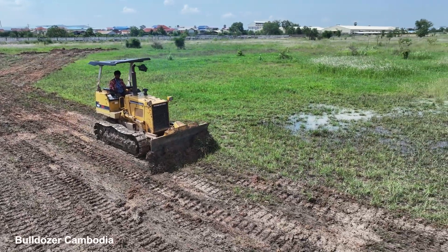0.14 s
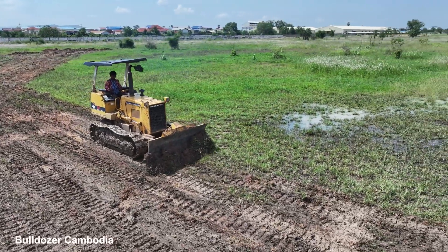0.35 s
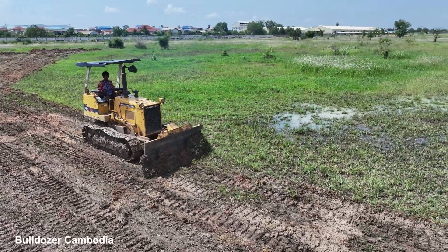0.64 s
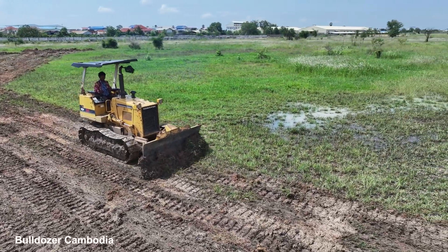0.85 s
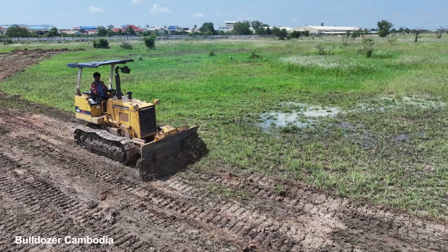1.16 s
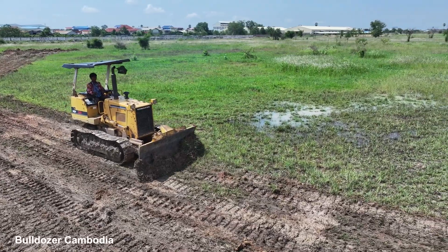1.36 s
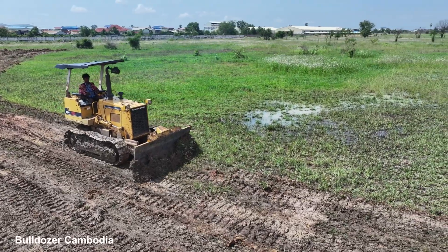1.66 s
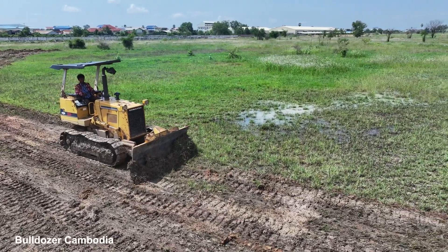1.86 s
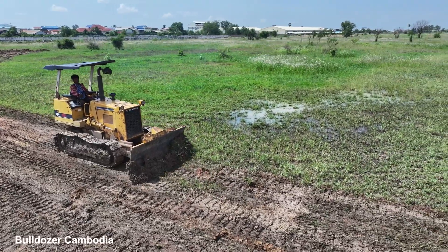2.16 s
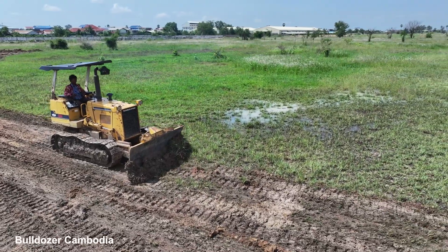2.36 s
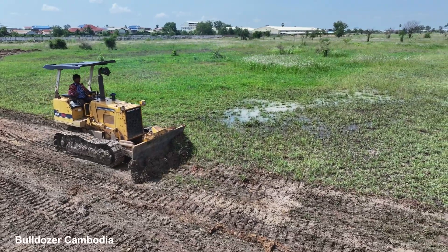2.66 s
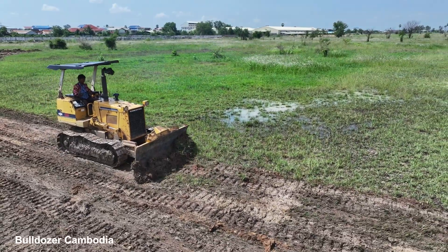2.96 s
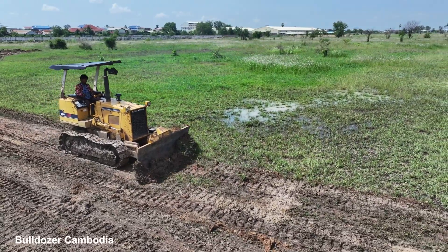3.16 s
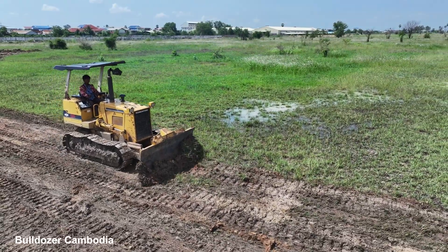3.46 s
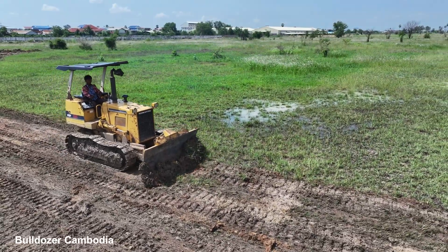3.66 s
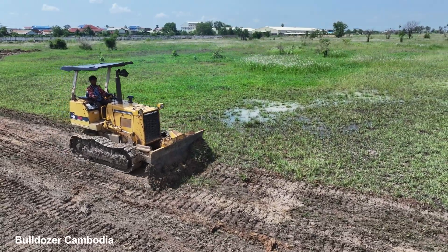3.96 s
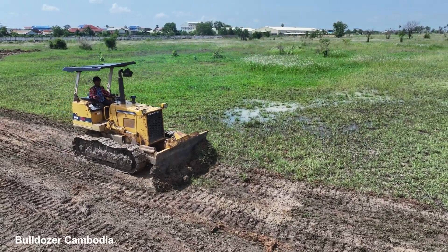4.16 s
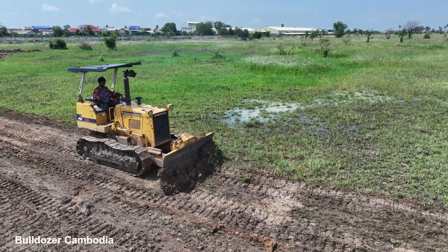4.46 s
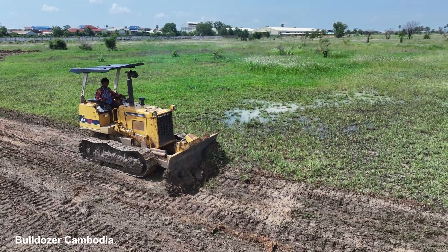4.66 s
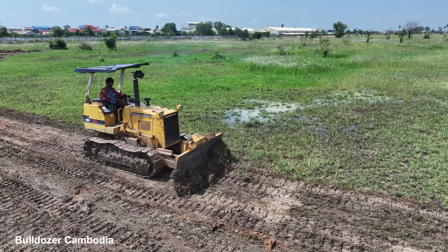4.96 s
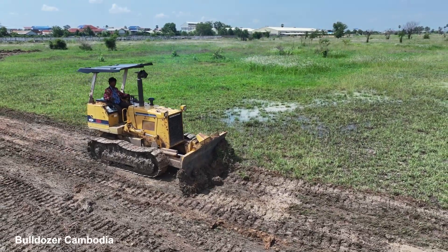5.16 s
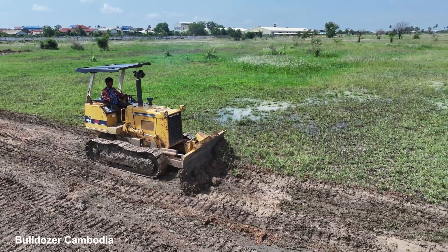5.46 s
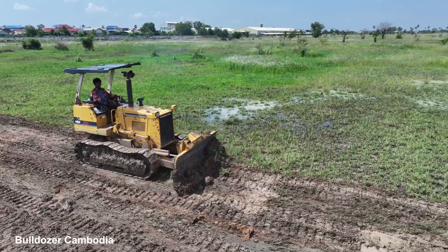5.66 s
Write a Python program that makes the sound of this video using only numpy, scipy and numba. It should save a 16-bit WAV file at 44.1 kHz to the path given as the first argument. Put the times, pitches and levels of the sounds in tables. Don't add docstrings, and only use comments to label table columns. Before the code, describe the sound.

A bulldozer works on open ground. First comes a muffled, steady engine hum with soft fan noise; then a sudden cut to a close, clattering diesel. Its two overlapping drones beat together as the pitch sags under load and rises again. Track plates clank twice, a pump whines briefly, and a bassy thump comes before the second clank. The engine ends running freer; single-channel outdoor pickup, little echo.

```python
import sys
import numpy as np
from scipy import signal
from scipy.fft import rfft, irfft
from scipy.io import wavfile
from scipy.ndimage import uniform_filter1d
from numba import njit

SR = 44100
rng = np.random.default_rng(int(sys.argv[2]) if len(sys.argv) > 2 else 0)


def bounce(signal):
    frames = np.transpose(np.atleast_2d(signal))
    limited = np.clip(frames, -1, 1)
    pcm = np.round(limited * 32767).astype(np.int16)
    wavfile.write(sys.argv[1], SR, pcm)


def natural_amplitude(level_db):
    exponent = np.asarray(level_db, float) / 20
    return 10 ** exponent


N = 256662
T = np.arange(N) / SR
HZ = np.fft.rfftfreq(N, 1 / SR) + 1e-3

# time in seconds, firing rate in Hz.
NEAR_SPEED = [
    (2.136, 72.1),
    (2.387, 71.59),
    (2.759, 77.41),
    (3.086, 79.74),
    (3.67, 77.49),
    (3.886, 72.52),
    (4.219, 75.9),
    (4.713, 71.83),
    (5.106, 73.38),
    (5.82, 80.02),
]
NEAR_START_S = NEAR_SPEED[0][0]


def curve(table):
    s, *columns = np.transpose(table)
    return [np.interp(T, s, column) for column in columns]


def colour(points):
    hz, db = np.transpose(points)
    return natural_amplitude(np.interp(np.log(HZ), np.log(hz), db))


def unit(x):
    return x / np.sqrt(np.mean(x ** 2))


def walk(rate):
    hold = int(SR / rate)
    steps = np.repeat(rng.standard_normal(N // hold + 1), hold)
    return 1.21 * uniform_filter1d(uniform_filter1d(steps, hold), hold)[:N]


@njit
def ring(x, hz, width):
    y, band, low = np.empty(len(x)), 0., 0.
    for i in range(len(x)):
        g, damping = np.tan(np.pi * hz[i] / SR), width / hz[i]
        v = (band + g * (x[i] - low)) / (1 + g * (g + damping))
        band, low, y[i] = 2 * v - band, low + 2 * g * v, damping * v
    return y


def through_mic(x):
    # frequency in Hz, gain in dB.
    mic_colour = [(7400, 0.5), (8100, -6.5), (8400, -21), (8700, -5), (9700, -0.5), (11000, -8.5),
                  (11600, -19), (11750, -59), (12350, -69), (12500, -21), (14000, -16), (15200, -23),
                  (15600, -26), (15800, -74)]
    return irfft(rfft(x) * colour(mic_colour), N)


def exhaust(turns, tone_db, orders, orders_db, wobble_db):
    out = natural_amplitude(tone_db + 0.32 * walk(9)) * np.cos(2 * np.pi * turns)
    for multiple, db in orders:
        drift = rng.random() + .0025 * multiple * walk(6)
        level = natural_amplitude(db + orders_db + wobble_db * walk(3.893))
        out += level * np.cos(2 * np.pi * (multiple * turns / 6 + drift))
    return np.sqrt(2) * out


def knocks(turns, pattern_db, unevenness, fade):
    first = int(np.floor(turns.min()))
    firing = np.floor(turns - first).astype(int) + first % 6
    chance_db = 1.2 * rng.standard_normal(N // 400)[firing]
    cylinder_db = unevenness * np.array(pattern_db)[firing % 6]
    sharp = natural_amplitude(cylinder_db + chance_db) * np.exp(-(turns % 1) / fade)
    return uniform_filter1d(sharp, size=230)


def roar(points, peaks, knock, share, flicker_db):
    rings = 1 + sum(natural_amplitude(db) / (1 + (2 * (HZ - hz) / width) ** 2) for hz, width, db in peaks)
    noise = rfft(rng.standard_normal(N)) * colour(points) * rings
    noise *= N / np.sqrt(2 * np.sum(abs(noise) ** 2))
    low, high = np.zeros(N), np.zeros(N)
    for octave in np.arange(5, 14.6, .5):
        band = irfft(noise * np.clip(1 - 2 * abs(np.log2(HZ) - octave), 0, 1), N)
        beat = unit(1 + share * np.clip((octave - 8.2) / 6.0, 0, 1.2) * knock)
        band *= beat * natural_amplitude(flicker_db * walk(18))
        if octave < 10:
            low += band
        else:
            high += band
    return low, high


def far_engine():
    # time in seconds, firing rate in Hz, level of the firing tone in dB.
    far_speed = [
        (0.0, 79.66, -23.2),
        (1.1, 79.7, -21.4),
        (2.18, 79.73, -21.5),
        (2.24, 81.31, -21.7),
        (2.99, 80.99, -24.6),
        (3.6, 79.86, -33.9),
        (3.95, 79.21, -35),
        (4.55, 79.88, -37),
    ]
    # multiple of the four-stroke cycle (the high ones are gear meshes), level in dB.
    far_orders = [(3, -37), (4, -38.5), (5, -45), (7, -34.5), (8, -32.5), (9, -38.5), (10, -39.5),
                  (11, -41.5), (12, -38), (13, -48.5), (14, -45.5), (15, -42.5), (17, -42), (27.5, -47),
                  (48, -53.5)]
    # frequency in Hz, level in dB per Hz.
    far_roar = [(33, -24), (60, 6.5), (120, 4.5), (220, -1.5), (350, -5.5), (430, -9), (630, -7),
                (800, -23.5), (1400, -20.5), (1600, -21.5), (1900, -15.5), (2600, -23), (3500, -24),
                (8000, -40)]
    # frequency in Hz, width in Hz, level in dB.
    far_lines = [(649, 17, 2), (890, 14, 1), (993, 18, 1), (1136, 12, 0.5), (1389, 25, 0),
                 (1501, 5.3, -15.5), (1772, 47, 1.5), (1924, 18, -6), (2113, 30, -2.5), (3445, 45, -6.5)]
    hz, tone_db = curve(far_speed)
    turns = .947 + np.cumsum(hz) / SR
    knock = knocks(turns, [-7, -2, 2, -6, -1, -4], unevenness=1, fade=0.5)
    low, high = roar(far_roar, far_lines, knock, share=1.1, flicker_db=0.0)
    surged = T >= NEAR_START_S
    roar_db = -32.3 - 2.5 * surged
    orders_db = -2 + 3.0 * surged
    hum = np.sqrt(2) * natural_amplitude(-40.5 + 1.5 * walk(1.9)) * np.sin(2 * np.pi * 41.9 * T)
    sound = exhaust(turns, tone_db, far_orders, orders_db, wobble_db=2.0) + hum
    sound += natural_amplitude(roar_db) * through_mic(low + high)
    return sound * np.clip((far_speed[-1][0] - T) / .03, 0, 1)


def thump():
    t = np.clip(T - 4.5206, 0, None)
    turns = 62 * t + 520 * .003 * (1 - np.exp(-t / .003))
    strength = np.exp(-t / .02) * (1 - np.exp(-(t / .0008) ** 2))
    swell = t / 0.028 * np.exp(1 - t / .03)
    boom = natural_amplitude(-18.5) * np.sin(2 * np.pi * 108 * t) + natural_amplitude(-25) * np.sin(2 * np.pi * 52 * t)
    return natural_amplitude(-5.5) * strength * np.sin(2 * np.pi * turns) + swell * boom


def clanks():
    # start in seconds, rise of the scrape in seconds, plate level in dB, link pitch in Hz,
    # link level in dB.
    track_clanks = [
        (2.6148, 0.00091, -14, 1100, -24),
        (4.607, 0.0066, -16.5, 1215, -21),
    ]
    rattle_colour = colour([(300, -14), (1500, -1), (3000, -3.5), (9000, -8.5), (16000, -2)])
    out = np.zeros(N)
    for s, rise, plate_db, link_hz, link_db in track_clanks:
        t = np.clip(T - s, 0, None)
        scrape = np.clip(t / rise, 0, 1) * np.exp(-(t / .03) ** 2)
        grit = rng.standard_normal(N) * natural_amplitude(2 * walk(500))
        rattle = unit(irfft(rfft(grit) * rattle_colour, N))
        plate = t / 0.017 * np.exp(.5 - .5 * (t / 0.019) ** 2) * np.sin(2 * np.pi * 502 * t)
        link = (t / 0.011) ** 2 * np.exp(2 - 2 * t / 0.0098) * np.sin(2 * np.pi * link_hz * t)
        out += natural_amplitude(-19.3) * through_mic(scrape * rattle) + natural_amplitude(plate_db) * plate + natural_amplitude(link_db) * link
    return out


def pump():
    t = T - 3.2
    swell = np.exp(-(t / np.where(t < 0, .25, .13)) ** 2)
    turns = 206 * t + 32 * t ** 2 / 2
    return natural_amplitude(-27) * swell * np.sin(2 * np.pi * turns)


def near_engine():
    # multiple of the four-stroke cycle (the high ones are gear meshes), level in dB.
    near_orders = [(5, -40.5), (7, -31), (8, -37), (9, -37), (11, -40.5), (12, -35.5), (13, -47),
                   (14, -42.5), (15, -41), (18, -43), (22, -48), (27.5, -37.5), (40, -45.5), (48, -48.5)]
    # frequency in Hz, level in dB per Hz.
    near_roar = [(40, -8), (100, -5), (200, -2), (340, 1), (430, -5.5), (600, 1.5), (900, -16),
                 (1140, -13.5), (1350, -15.5), (1700, -11.5), (2800, -15), (4500, -20.5), (7500, -26),
                 (11000, -24.5)]
    # frequency in Hz, width in Hz, level in dB.
    near_panels = [(600, 18, -5), (1054, 16, -1), (1147, 38, 1), (1402, 22, -1), (1605, 64, 0.5),
                   (2115, 15, 3.5), (2550, 63, -3.5), (3450, 39, -7), (3850, 53, -3), (4205, 46, -3),
                   (4950, 96, -4), (5390, 78, 0), (6350, 84, -2.5)]
    hz, = curve(NEAR_SPEED)
    on = T >= NEAR_START_S
    turns = .233 + np.cumsum(hz * on) / SR
    free = (hz - 72) / (80 - 72)
    turned = np.clip((T - 3.65) / 1.15, 0, 1)

    valve_share = .85 - .4 * free - .12 * turned
    valve_turns = turns[int(3.888 * SR)]
    knock = knocks(turns - valve_turns, [11, 3.5, -2.5, -12, -13, -12], valve_share, fade=0.74)
    low, high = roar(near_roar, near_panels, knock, share=0.71, flicker_db=1.04)

    block_hz = 2120 + (1900 - 2120) * np.clip(4 * turned - 1, 0, 1)
    block = rng.standard_normal(N) * (1 + 0.46 * knock ** 2)
    block = unit(ring(ring(block, block_hz, 300.0), block_hz, 300.0))
    high = unit(high) + natural_amplitude(-9.5 + 1.3 * turned) * block

    echo_hz = np.clip(2850 * 2 ** ((T - NEAR_START_S) / 1.95), 2850, 7500)
    high = through_mic(high - .45 * ring(high, echo_hz, 1000.0))

    shield_db = -1.4 * np.sin(np.pi * turned)
    knock_db = -32.2 + free * (-.6 + 1.1 * turned) + shield_db
    roar_db = -26.5 - 2.5 * free * (1 - turned) - 1.5 * turned
    body = natural_amplitude(roar_db) * unit(low) + natural_amplitude(knock_db) * high
    tone_db = -14.2 + free * (-1.6 + 1.4 * turned)
    pulses = exhaust(turns, tone_db, near_orders, -.6 * turned, wobble_db=2.5)
    return on * (pulses + body + pump())


def scene():
    fade_in = np.clip(T / .002, 0, 1) ** 2
    return fade_in * (far_engine() + thump() + clanks() + near_engine())[None]


def top_cut(x):
    return signal.sosfilt(signal.butter(12, 16510, fs=SR, output="sos"), x)


def record(dry):
    return top_cut(dry)


dry = scene()
out = record(dry)
bounce(out)
```